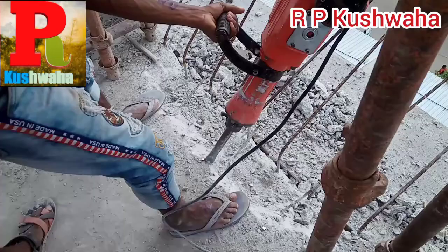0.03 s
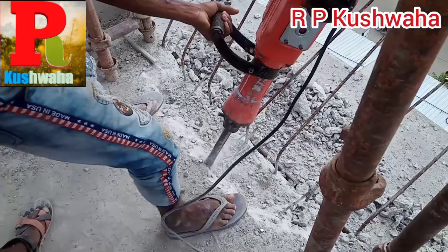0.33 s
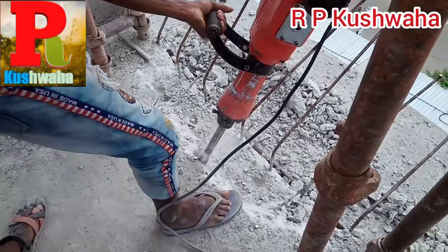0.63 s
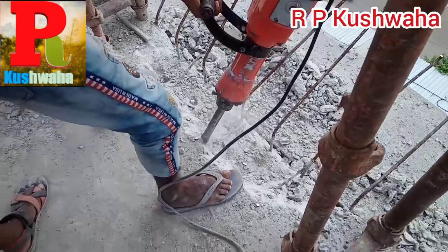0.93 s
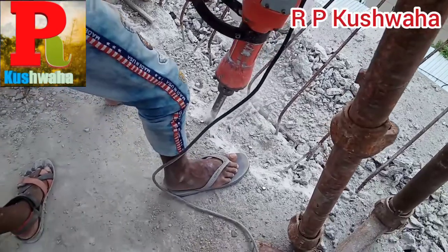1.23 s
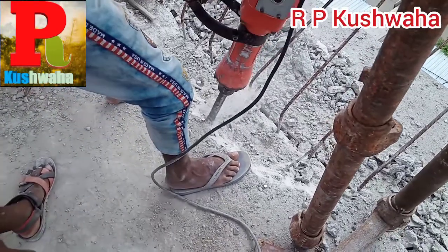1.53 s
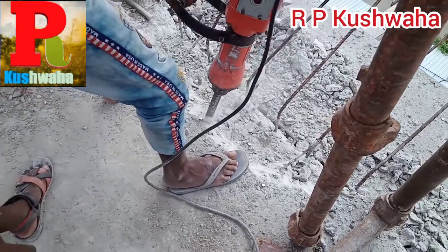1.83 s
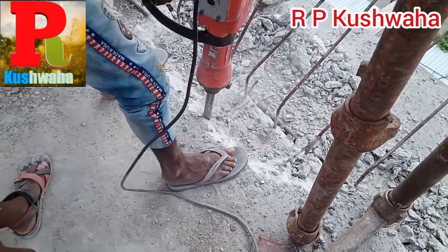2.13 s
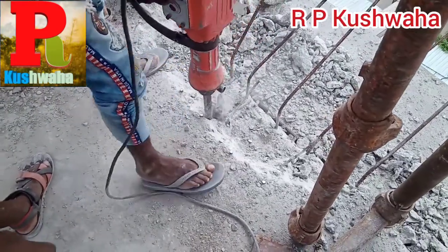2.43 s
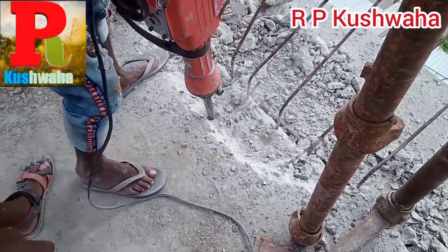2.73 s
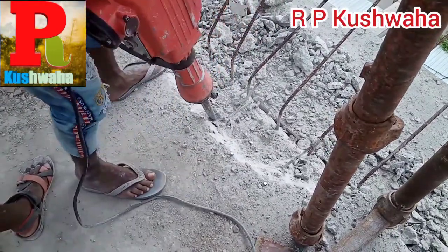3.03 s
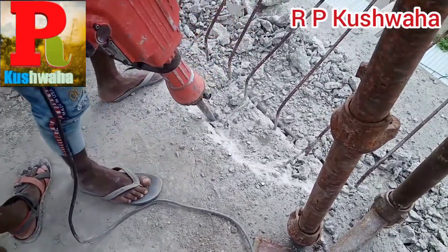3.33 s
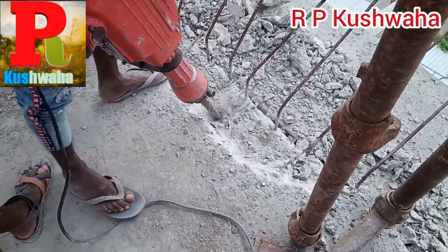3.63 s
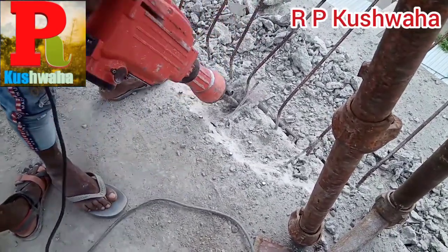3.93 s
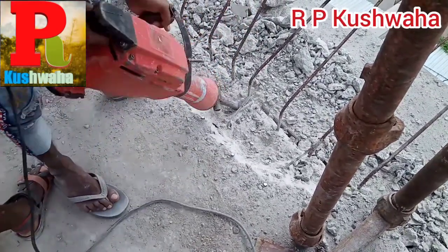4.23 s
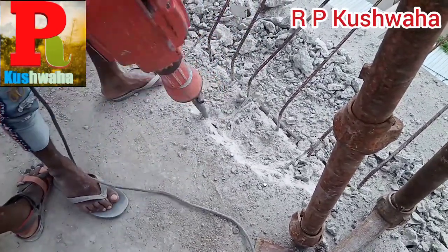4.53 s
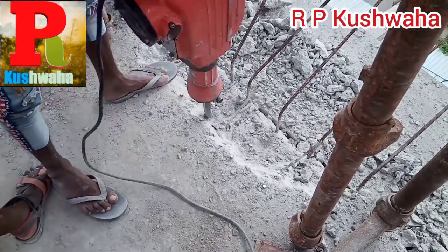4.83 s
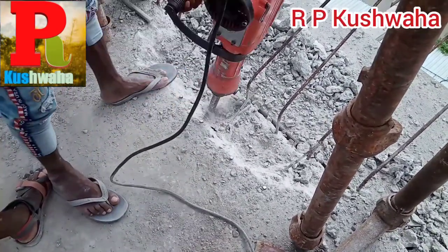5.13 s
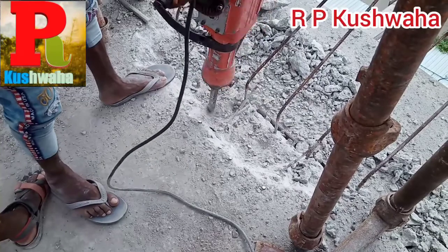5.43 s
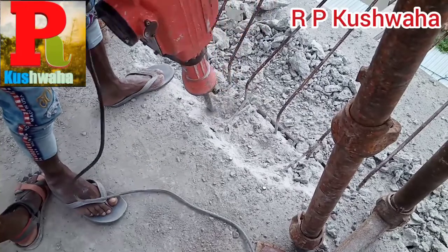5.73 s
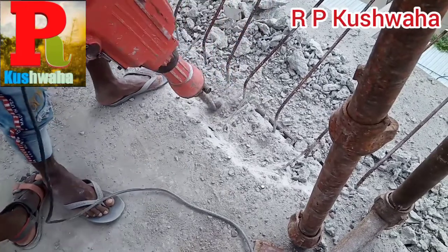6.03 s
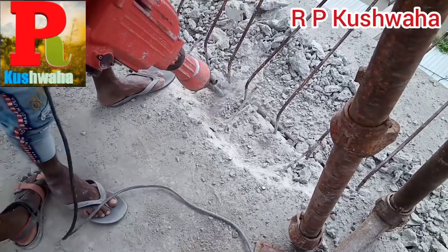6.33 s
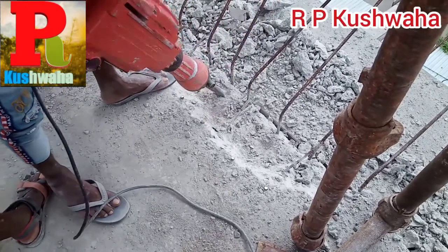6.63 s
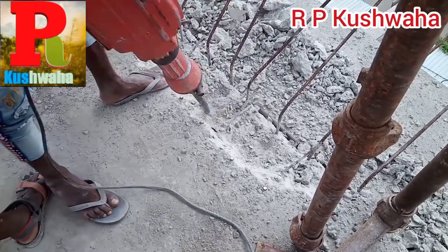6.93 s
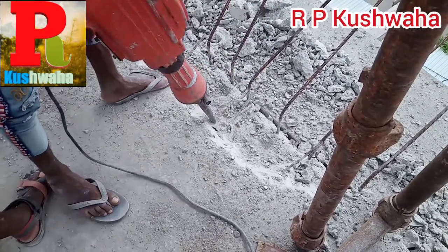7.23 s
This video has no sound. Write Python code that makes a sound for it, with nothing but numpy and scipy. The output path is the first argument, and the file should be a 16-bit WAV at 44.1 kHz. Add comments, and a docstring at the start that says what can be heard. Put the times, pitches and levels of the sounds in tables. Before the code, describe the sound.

An electric demolition hammer starts up close by outdoors and pounds a concrete slab in rapid, loud blows. Each hit crunches and sets the steel chisel ringing over whining gears and a faint trickle of grit. Past the middle the tool is lifted and the motor rattles with only a few knocks. It digs in again, then lifts once more, ending on scattered knocks.

```python
"""An electric demolition hammer starts up outdoors, close by, its chisel wedged in a concrete slab's joint.
Each stroke the gears strain against the air cushion, then the striker hits: slab and casing bark, the
steel rings on, grit trickles. From 2.7 s the chisel works the open slab and its ring changes colour.
Near 4.3 s the tool is lifted and the motor rattles on with few blows. It digs in again near 4.9 s and
is lifted once more near 6.6 s, ending on scattered knocks. A fast limiter holds the peaks throughout."""
import sys
import numpy as np
from scipy import signal
from scipy.fft import rfft, irfft
from scipy.io import wavfile
from scipy.ndimage import uniform_filter1d, minimum_filter1d

SR = 44100
rng = np.random.default_rng(int(sys.argv[2]) if len(sys.argv) > 2 else 0)


def unload_audio(sound):
    """Save the sound as a 16-bit wav file, at the path given as the first command line argument."""
    columns = np.transpose(np.atleast_2d(sound))
    # keep every value between -1 and 1, then stretch to whole-number steps
    steps = np.round(np.clip(columns, -1, 1) * 32767)
    wavfile.write(sys.argv[1], SR, steps.astype(np.int16))


N = 325017
TIME = np.arange(N) / SR
MOTOR_START_S, OUT_OF_JOINT_S = .11, 2.7
# The balance of the layers in a blow of ordinary force.
THUD_DB, CRUNCH_DB, CASING_DB, CRACK_DB = -51.5, -23.5, -17, -23
LOWER_RING_DB, UPPER_RING_DB = -43.5, -41.5

# The rhythm while the tool is leaned on. Each row: first and last blow in seconds, number of blows,
# growth of the gap per blow in seconds.
BLOW_RUNS = [(.1318, .4485, 8, -.0005), (.4918, 1.4215, 23, -.00003), (1.4635, 1.903, 12, -.00013),
             (1.9472, 2.2302, 8, -.0004), (2.2715, 2.599, 9, 0), (2.648, 3.0127, 7, .0059),
             (3.0779, 3.2337, 4, -.0045), (3.2805, 3.9125, 16, -.00042), (3.9496, 4.0743, 4, 0),
             (4.1236, 4.2853, 4, -.0047), (4.8701, 5.1026, 5, -.0053), (5.1545, 5.4187, 7, -.0004),
             (5.4418, 5.939, 12, -.00012), (5.98, 6.581, 16, -.0001)]
# How hard the tool works. Each row: time in seconds, then force, bite into the concrete, gear strain,
# chisel looseness and contact hardness, all in dB.
EFFORT_CURVES = [(.13, -13.5, 4, -45, 16, 2), (.42, 1, 2, -30, 7, -0.5), (1.2, -1, 2.5, -24, 0, 4),
                 (1.6, -2.5, -0.5, -23.5, -2, 1.5), (2.0, -2.5, 0.5, -23.5, -1, 2),
                 (2.55, -0.5, -4, -22.5, -4, -1.5), (2.95, 1, 1.5, -31, -14, -4.5),
                 (3.27, 1.5, -0.5, -20.5, -7, 1), (3.7, 0.5, -2.5, -18.5, -9, 0),
                 (4.1, -1, 3, -22, -5, 2.5), (4.29, -9.5, -0.5, -43, -16, -4),
                 (4.87, 2.5, -3.5, -29, 5, 0.5), (5.2, -1, -0.5, -19, -5, 2),
                 (5.42, 4.5, 1, -27, -16, -3.5), (5.75, 2.5, 1, -24, -4, 0.5),
                 (6.15, 0, 1.5, -19.5, -19, 1), (6.58, 0, 0.5, -22, -19, -1.5)]
# Knocks with the tool lifted. Each row: time in seconds, force in dB, contact hardness in dB.
LIFTED_BLOWS = [(4.6094, -3.5, -1.5), (4.7503, -8.5, -1), (4.7966, -9, -14), (6.63, -3, 0),
                (6.664, -9, -17), (6.7146, -12, -22), (6.8731, -11.5, -14), (6.9373, -15, -6),
                (6.9898, -12, -4), (7.0584, -12, -8), (7.1758, 0, -1.5), (7.279, 2, 3), (7.3533, 5, 1.5)]
# Blows that break deep into the slab. Each row: time in seconds, extra weight in dB, slab boom in dB.
DEEP_BLOWS = [(.224, 11.5, -50), (.747, 11, -48), (1.168, 7.5, -50), (1.625, 10, -44), (3.99, 6.5, -48),
              (4.936, 9, -62), (5.051, 7.5, -45), (5.287, 12.5, -60), (5.443, 4, -58), (5.577, 10, -32),
              (5.759, 10, -50), (5.806, 10, -41), (5.851, 0, -42), (5.98, 7, -51), (6.062, 11, -34),
              (6.144, -1, -43)]
# Blows that stop dead, or glance off and chatter. Each row: time in seconds, extra force in dB,
# base t60 of the burst in seconds.
ACCENT_BLOWS = [(.449, 1, .04), (1.128, -3, .09), (1.7446, 2.5, 0.099), (1.866, -2.5, 0.1),
                (2.151, 1.5, 0.073), (2.1915, -2.5, 0.12), (2.354, 2.5, 0.05), (2.396, 0, .045),
                (2.695, 2, .06), (2.936, 2.5, 0.047), (3.328, -3.5, .07), (3.548, -3, 0.075),
                (3.672, 2, 0.058), (3.833, -2.5, .075), (3.913, -7, .11), (3.95, 1, 0.078),
                (4.034, -5.5, 0.16), (4.609, 2, 0.05), (4.751, 1.5, .045), (5.334, 1, .042),
                (5.419, 0, .022), (5.67, -3.5, .11), (5.717, -4.5, 0.094), (5.894, 1.5, .057),
                (6.54, -0.5, 0.053)]
# The chisel bounces free and sings. Each row: time in seconds, lower ring in dB, upper ring in dB.
SINGING_BLOWS = [(.404, -36, -21), (.533, -36, -25.5), (.664, -39, -22.5), (.705, -26, -23.5),
                 (.79, -27, -24), (.83, -33.5, -24.5), (.916, -35, -27), (1.043, -37, -26),
                 (1.083, -38, -32), (1.128, -50, -26.5), (1.168, -31, -29.5), (1.379, -19, -30),
                 (1.625, -46, -27), (1.745, -51, -32), (1.866, -46, -32), (2.23, -32, -31),
                 (3.078, -33.5, -41), (3.234, -34, -40), (3.28, -28, -40), (3.328, -34, -43),
                 (4.87, -29, -40), (5.051, -26, -29), (5.154, -33, -44), (5.374, -28.5, -38),
                 (5.67, -39, -37), (6.225, -37, -50), (6.422, -38.5, -48), (7.176, -36, -30.5)]
# The chisel flies against its retainer. Each row: time in seconds, level in dB.
RETAINER_CLANKS = [(2.455, -16.5), (3.157, -21), (4.6082, -25)]

# The chisel's voice in three registers. Each row: pitch in Hz, level in the joint in dB,
# level on the open slab in dB, base t60 in seconds.
CHISEL_BENDING = [(393, -37, -41.5, 0.12), (1334.5, -20.5, -28.5, 0.29), (3090, -17, -21, 0.18)]
CHISEL_LOWER = [(5600, -2, -8, 0.27), (5850, -17, -10, 0.12)]
CHISEL_UPPER = [(8245, -0.5, -6, .35), (8480, -7, 0.5, 0.15), (8795, -13, -4.5, .36),
                (11100, -21, -30, .25), (11850, -23, -26, .25), (12737, -19, -21, .25),
                (13121, -20, -15, .22), (14287, -27, -25, .2), (15606, -26, -25, .35)]
# The free-hanging chisel and the flexing slab. Each row: pitch in Hz, level in dB, t60 in seconds.
CHISEL_FREE = [(2500, -7, .05), (3560, 6, .04), (4080, -3, 0.043), (7450, -14, .2), (8400, -18, .12),
               (9440, -12, .2), (13770, -23, .13), (15350, -21, .17)]
SLAB_FLEX = [(56, -12, .09), (80, -2, .08), (112, 0, .07)]
# The housing and the air around it resonate. Each row: centre in Hz, width in Hz, boost or cut in dB.
HOUSING_RESONANCES = [(633, 108, 4), (866, 39, 1), (1210, 200, 4), (1603, 33, 4), (1990, 39, 3.5),
                      (2060, 37, 1), (2160, 24, 3.5), (3200, 110, 3.5), (3616, 120, 3.5), (4270, 70, -5),
                      (4480, 93, 0)]
# The loose chisel jingles in its holder. Each row: centre in Hz, width in Hz, level in dB.
HOLDER_JINGLE = [(3170, 63, 4.5), (8520, 55, -12), (13290, 35, -11), (14600, 90, -21)]

# The whine of straining gears. Each row: multiple of the mesh rate, level in dB.
GEAR_HARMONICS = [(1, -6), (2, -4.5), (3, -13)]
# The fader ride of motor and fan. Each row: time in seconds, level in dB.
MOTOR_FADER = [(.11, -40.5), (.3, -33), (.4, -26.5), (.8, -26.5), (1.2, -29.5), (2.0, -30.5), (2.5, -27),
               (2.9, -33.5), (3.05, -27), (4.2, -28.5), (4.4, -30.5), (4.7, -33), (4.8, -25), (5.2, -26.5),
               (6.7, -28.5), (7.0, -25), (7.2, -29), (7.37, -22.5)]
# Off load the gears go slack once a turn and the rattle drops out. Each row: first and last dip in
# seconds, number of turns, growth of the gap per turn in seconds, depth in dB.
GEAR_SLACK = [(4.159, 4.548, 8, 0.0026, 7), (6.563, 7.048, 10, 0.0029, 13.5)]

# Tone curves for a blow's four layers, the motor and the echoes.
# Each row: frequency in Hz, relative level in dB.
THUD_EQ = [(20, -17), (45, -29), (75, -10), (130, -1.5), (220, -2), (320, -9), (600, -50)]
CRUNCH_EQ = [(100, -33), (260, -11), (380, -9), (500, -9.5), (650, -9.5), (880, -6), (1250, -5), (1600, 2),
             (2000, -0.5), (2500, -7.5), (3000, -35), (5000, -21)]
CASING_EQ = [(1000, -36), (2100, -10), (2600, -6), (2900, -0.5), (3100, -2.5), (3230, 1.5), (3380, 4),
             (3600, 3), (3950, -1), (4300, -4), (4700, -9.5), (5500, -37), (9000, -53)]
CRACK_EQ = [(2500, -17.5), (4700, -4.5), (5600, 4), (6100, -3.5), (6600, -9.5), (7300, 2), (8000, -1),
            (8500, 3), (9300, -4), (10500, -9.5), (11500, -14.5), (13200, -8.5), (14500, -15), (16000, -16)]
MOTOR_EQ = [(25, -73), (110, -14.5), (300, -13.5), (450, -15), (800, -11), (1300, -7), (2000, -2),
            (2650, -4.5), (3300, 2.5), (4100, -4), (6400, -21.5), (8000, -18.5), (11000, -32.5),
            (16000, -80)]
SITE_EQ = [(40, -12), (150, 0), (380, 11.5), (800, -4), (2000, -9), (4000, -11), (8000, -11), (16000, 1.5)]


def impacts(thud_db, crunch_db, casing_db, crack_db, rebound=0.78, rebound_s=.019):
    """Each blow crushes concrete and shakes slab, casing and steel; the tool thumps as it drops back."""
    lengths = burst_lengths(casing_db)
    thud = bursts(thud_db, lengths, stretch=1.0, snap=3.9, snap_s=0.001, rise_s=0.00039)
    thud = thud + rebound * np.interp(TIME - rebound_s, TIME, thud)
    crunch = bursts(crunch_db, lengths, stretch=0.98, snap=1.4, snap_s=0.0013, rise_s=0.00044)
    casing = bursts(casing_db, lengths, stretch=0.78, snap=1.0, snap_s=0.00075, rise_s=0.00008)
    crack = bursts(crack_db, lengths, stretch=0.94, snap=0.05, snap_s=0.00048, rise_s=0.00099)
    return (from_db(3.5) * colour(thud * grains(20000, 0.95), THUD_EQ)
            + from_db(-2) * colour(crunch * grains(9000, 3.7), CRUNCH_EQ)
            + from_db(-1) * colour(casing * grains(12000, 1.8), CASING_EQ)
            + from_db(-0.14) * colour(crack * grains(9000, 3.4), CRACK_EQ))


def bursts(level_db, lengths, stretch, snap, snap_s, rise_s, window_s=0.0099):
    """Blow envelopes: a hard first contact, then dying chatter; level is the rms of the opening window."""
    out, age = np.zeros(2 * N), np.arange(SR // 8) / SR
    for s, t60, db in zip(blow_times(), lengths, level_db):
        attack = 1 - np.exp(-age / rise_s)
        shape = attack * (decay(age, t60 * stretch) + snap * np.exp(-age / snap_s))
        opening_rms = np.sqrt(np.mean(shape[age < window_s] ** 2))
        add_at(out, s, from_db(db) * shape / opening_rms)
    return out[:N]


def burst_lengths(casing_db, wedged_s=0.075, open_s=0.074, halving_db=22, scatter_octaves=0.21):
    """Base t60 of each burst: hard blows break through at once, weak ones chatter on."""
    at = blow_times()
    octaves = (CASING_DB - casing_db) / halving_db + scatter_octaves * rng.standard_normal(len(at))
    lengths = np.where(at < OUT_OF_JOINT_S, wedged_s, open_s) * 2 ** octaves
    accents, _, t60 = blows_in(ACCENT_BLOWS)
    lengths[accents] = t60
    return lengths


def blow_levels():
    """Each layer's level in dB, blow by blow: all ride the effort, with scatter so no two are alike."""
    at = blow_times()
    effort_s, *curves = np.transpose(EFFORT_CURVES)
    force, bite, strain, looseness, hardness = (np.interp(at, effort_s, curve) for curve in curves)
    lifted, lifted_force, lifted_hardness = blows_in(LIFTED_BLOWS)
    force[lifted], hardness[lifted] = lifted_force, lifted_hardness
    bite[lifted], strain[lifted] = 0, lifted_force - 28
    accents, extra_force_db, _ = blows_in(ACCENT_BLOWS)
    force[accents] += extra_force_db
    deep, extra_weight_db, _ = blows_in(DEEP_BLOWS)
    weight = np.zeros(len(at))
    weight[deep] = extra_weight_db
    scatter = rng.standard_normal((len(at), 7)).T
    force += 1.33 * scatter[0]
    bite += 1.5 * scatter[1]
    steel = force + hardness + scatter[6]
    lower = LOWER_RING_DB + steel + 3.5 * scatter[2]
    upper = UPPER_RING_DB + steel + looseness + 3.5 * scatter[3]
    singing, lower_db, upper_db = blows_in(SINGING_BLOWS)
    lower[singing], upper[singing] = lower_db, upper_db
    thud = THUD_DB + force + bite + weight + 2 * scatter[4]
    crunch = CRUNCH_DB + force + bite + 0.49 * weight
    casing = CASING_DB + force + 0.32 * weight
    strain += 1.5 * scatter[5]
    return thud, crunch, casing, CRACK_DB + steel, lower, upper, strain


def blow_times():
    """Every blow in order, in seconds: the runs and the single knocks."""
    runs = [run_times(*run) for run in BLOW_RUNS]
    return np.sort(np.concatenate(runs + [np.array(LIFTED_BLOWS)[:, 0]]))


def run_times(first_s, last_s, count, growth_s):
    """The beat of a run of crank turns, steadily dragging or rushing."""
    turn = np.arange(round(count))
    return np.linspace(first_s, last_s, len(turn)) + growth_s * turn * (turn - turn[-1]) / 2


def blows_in(table):
    """The nearest blow to each cue in a table, then the table's other columns."""
    s, *columns = np.transpose(table)
    return np.abs(blow_times()[:, None] - s).argmin(axis=0), *columns


def chisel(modes, ring_db, scatter_db, free_db, detune=0.00058, doubling_db=18, settle_s=0.022,
           chatter_db=1.7, seat_s=0.012, seat_db=3):
    """The steel rings unevenly until pressed home for the next blow; a louder, freer ring lasts longer."""
    last, _, age, wait = stroke_clock()
    on_slab = blow_times() > OUT_OF_JOINT_S
    freedom = np.clip(2 ** ((ring_db - free_db) / doubling_db), .5, 2)
    ring = np.zeros(N)
    for hz, wedged_db, slab_db, t60 in modes:
        strength, pitch, start = rng.standard_normal((len(ring_db), 3)).T
        db = ring_db + np.where(on_slab, slab_db, wedged_db) + scatter_db * strength
        seated_hz = hz * (1 + detune * pitch[last])   # each new seating shifts the pitch
        phase = 2 * np.pi * (seated_hz * age + start[last])
        ring += from_db(db)[last] * decay(age - settle_s, t60 * freedom[last]) * np.sin(phase)
    # The tip bites into the concrete again and chokes the ring.
    bite_s = rng.uniform(.026, .062, len(ring_db))
    choke_db = 5.5 * (1 + np.tanh((age - bite_s[last]) / .005))
    contact = from_db(chatter_db * drift(125) - seat_db * np.exp(-wait / seat_s) - choke_db)
    return np.sqrt(2) * ring * contact * (age > 0)


def stroke_clock():
    """For each sample: the last blow, the next blow, seconds since the one and until the other."""
    at = blow_times()
    passed = np.searchsorted(at, TIME)
    last, coming = np.maximum(passed - 1, 0), np.minimum(passed, len(at) - 1)
    return last, coming, np.maximum(TIME - at[last], 0), np.abs(at[coming] - TIME)


def retainer_clanks():
    """The chisel flies forward against its retainer and rings as it hangs free."""
    return struck(*np.transpose(RETAINER_CLANKS), CHISEL_FREE)


def stones(crunch_db, stone_db=-3, low_hz=1100, high_hz=2400, t60=0.021, count=3):
    """Every blow finds fresh fragments, each with a short stony ring of its own."""
    out, age = np.zeros(2 * N), np.arange(SR // 16) / SR
    polarity = (-1) ** np.arange(count)
    for s, db, draws in zip(blow_times(), crunch_db, rng.random((len(crunch_db), count))):
        hz = low_hz * (high_hz / low_hz) ** draws
        rings = polarity @ np.sin(2 * np.pi * hz[:, None] * age)
        add_at(out, s, from_db(db + stone_db) * rings * decay(age, t60))
    return out[:N]


def slab_boom():
    """Low end under the heaviest blows: the whole slab flexes."""
    deep, _, boom_db = blows_in(DEEP_BLOWS)
    return struck(blow_times()[deep], boom_db, SLAB_FLEX)


def gear_strain(strain_db, teeth=77, lead_s=0.011, edge_s=0.0022, sag=.07, sag_s=.012):
    """The piston squeezes the air cushion before each blow: the gears rasp, whine and slow a little."""
    _, coming, age, wait = stroke_clock()
    load = .5 * (1 + np.tanh((lead_s - wait) / (2 * edge_s))) * (TIME < blow_times()[-1])
    stroke_s = np.clip(age + wait, .038, .067)
    judder = .016 * drift(300)
    mesh_hz = teeth / stroke_s * (1 - sag * np.exp(-wait / sag_s)) * (1 + judder)
    phase = 2 * np.pi * np.cumsum(mesh_hz) / SR
    force = from_db(strain_db[coming]) * load * (coming > 0)
    whine = sum(from_db(db) * np.sin(round(multiple) * phase) for multiple, db in GEAR_HARMONICS)
    rasp = from_db(-4) * colour(force * grains(5000, 5.3), MOTOR_EQ)
    flutter = from_db(2 * drift(170))
    return uniform_filter1d(force, size=64) * whine * flutter + rasp


def motor(mesh_hz=1576, waver=0.055, whine_db=-17, slack_s=0.0035, rattle_db=2.5, swing_db=1.5):
    """Gears, bearings and fan clatter with a wavering whine and a jingle, ducking as the gears go slack."""
    db = np.interp(TIME, *np.transpose(MOTOR_FADER))
    for *run, depth_db in GEAR_SLACK:
        for s in run_times(*run):
            db -= depth_db * np.exp(-.5 * np.minimum(np.abs(TIME - s) / slack_s, 10) ** 2)
    force = from_db(db + rattle_db * drift(107) + swing_db * drift(39)) * (TIME > MOTOR_START_S)
    whine_hz = mesh_hz * (1 + waver * drift(20) + 0.016 * drift(270))
    phase = 2 * np.pi * np.cumsum(whine_hz) / SR
    whine = from_db(whine_db) * force * (np.sin(phase) / 2 + np.sin(2 * phase))
    knocks = force * grains(per_s=70, spread_db=4.2)
    jingle = sum(from_db(level) * resonance(knocks, hz, width) for hz, width, level in HOLDER_JINGLE)
    clatter = from_db(-3) * colour(force * grains(5000, 3.9), MOTOR_EQ)
    return clatter + whine + jingle


def housing(clatter):
    """The housing and the air around it stamp narrow peaks and a notch on the clatter."""
    bands = ((from_db(db) - 1) * resonance(clatter, hz, width) for hz, width, db in HOUSING_RESONANCES)
    return clatter + sum(bands)


def grit(per_s=120, level_db=-55, tick_s=0.0022):
    """Loose chips skip on the shaking slab: a faint trickle of bright ticks."""
    landings = np.abs(grains(per_s, spread_db=5)) + 1e-18
    envelope = signal.lfilter([1], [1, -np.exp(-1 / (tick_s * SR))], landings)
    ticks = colour(rms_one(envelope) * rng.standard_normal(N), CRACK_EQ)
    return from_db(level_db) * ticks * (TIME > blow_times()[0])


def site_echoes(x, predelay_s=0.011, t60=0.32, level_db=-16.5):
    """Short scatter from the slab, props and rubble, strongest in the low mids."""
    age = TIME[:SR // 2]
    tail = rng.standard_normal(len(age)) * decay(age, t60) * (age > predelay_s)
    wet = signal.fftconvolve(x, tail / np.linalg.norm(tail))[:N]
    return from_db(level_db) * colour(wet, SITE_EQ)


def struck(times, levels_db, modes):
    """Each strike sets a body's modes ringing and dying away."""
    out, age = np.zeros(2 * N), np.arange(SR // 3) / SR
    ring = sum(from_db(db) * np.sin(2 * np.pi * hz * age) * decay(age, t60) for hz, db, t60 in modes)
    for s, db in zip(times, levels_db):
        add_at(out, s, from_db(db) * ring)
    return out[:N]


def grains(per_s, spread_db):
    """A crackle of tiny random contacts, uneven in size; rms 1."""
    sizes = from_db(spread_db * np.clip(rng.standard_normal(N), -2, 2)) * rng.choice([-1, 1], N)
    return rms_one(sizes * (rng.random(N) < per_s / SR))


def colour(x, curve, size=4096):
    """Minimum-phase EQ: no pre-ring, and white noise keeps its power."""
    hz, db = np.transpose(curve)
    grid = np.maximum(np.fft.rfftfreq(size, 1 / SR), 1)
    gains = from_db(np.interp(np.log(grid), np.log(hz), db))
    cepstrum = irfft(np.log(gains))
    cepstrum[1:size // 2] *= 2
    cepstrum[size // 2 + 1:] = 0
    response = irfft(np.exp(rfft(cepstrum)))
    return signal.fftconvolve(x, response / np.linalg.norm(response))[:N]


def resonance(x, hz, width_hz):
    """Two-pole band-pass with a gain of 1 at its centre."""
    r = np.exp(-np.pi * width_hz / SR)
    feedback = [1, -2 * r * np.cos(2 * np.pi * hz / SR), r * r]
    return signal.lfilter(np.array([1, 0, -1]) * (1 - r * r) / 2, feedback, x)


def drift(rate_hz):
    """Smooth random modulation; rms 1."""
    lowpass = signal.butter(2, rate_hz, fs=SR, output="sos")
    return rms_one(signal.sosfilt(lowpass, rng.standard_normal(N)))


def decay(age, t60):
    """A tail that falls 60 dB in t60 seconds."""
    return np.exp(-np.log(1000) * age / t60)


def add_at(track, start_s, sound):
    """Drop a sound onto a track."""
    start = int(start_s * SR)
    track[start:start + len(sound)] += sound


def from_db(db):
    """Decibels to gain."""
    return 10 ** (np.asarray(db) / 20)


def rms_one(x):
    """Scale to an rms of 1."""
    return x / np.sqrt(np.mean(x ** 2) + 1e-20)


def scene():
    """The mono mix: hammer and chisel up front, grit and site echoes behind."""
    thud_db, crunch_db, casing_db, crack_db, lower_db, upper_db, strain_db = blow_levels()
    bending = chisel(CHISEL_BENDING, casing_db - 3.5, scatter_db=3, free_db=-7.5)
    lower = chisel(CHISEL_LOWER, lower_db, scatter_db=3, free_db=-50)
    upper = chisel(CHISEL_UPPER, upper_db, scatter_db=1.5, free_db=-38)
    steel = bending + lower + upper + retainer_clanks()
    blows = impacts(thud_db, crunch_db, casing_db, crack_db) + stones(crunch_db)
    clatter = blows + gear_strain(strain_db) + motor()
    direct = from_db(-1) * housing(clatter) + steel + slab_boom() + grit()
    return (direct + site_echoes(direct))[None]


def record(dry, ceiling=0.69, low_cut_hz=42, high_cut_hz=15850):
    """A fast limiter holds the peaks; deep bass and the very top are cut."""
    gain = np.minimum(1, ceiling / (np.abs(dry) + 1e-9))
    gain = uniform_filter1d(minimum_filter1d(gain, size=45), size=45)   # about 1 ms of hold and smoothing
    low_cut = signal.butter(4, low_cut_hz, "high", fs=SR, output="sos")
    high_cut = signal.ellip(10, .2, 70, high_cut_hz, fs=SR, output="sos")
    return signal.sosfilt(high_cut, signal.sosfilt(low_cut, dry * gain))


dry = scene()
out = record(dry)
unload_audio(out)
```